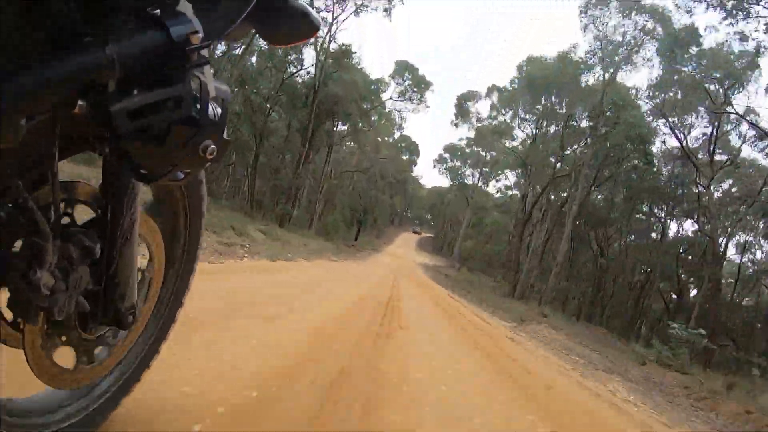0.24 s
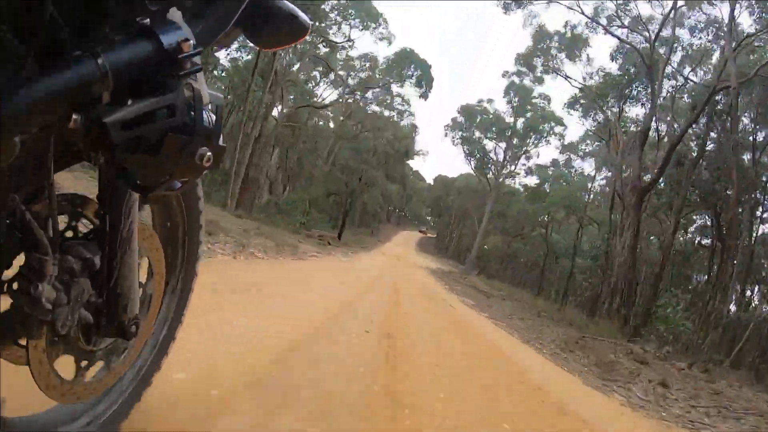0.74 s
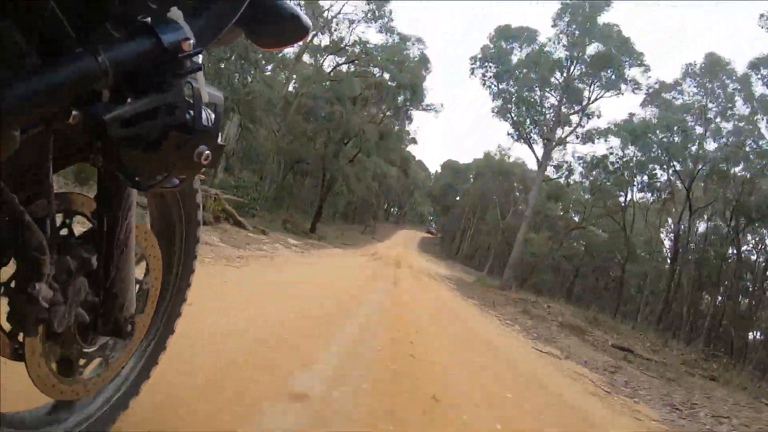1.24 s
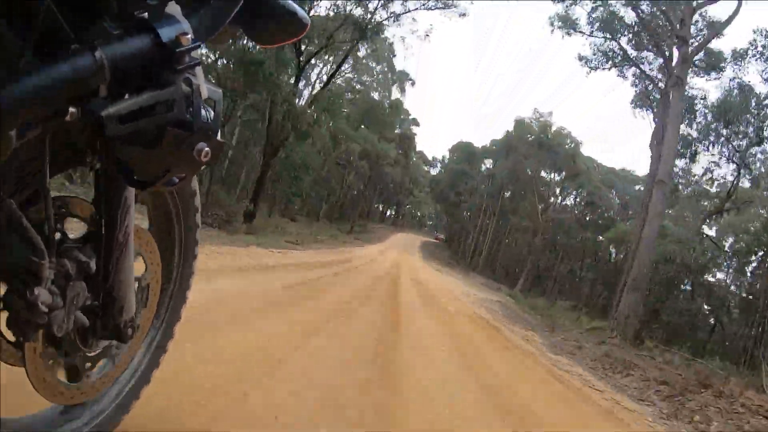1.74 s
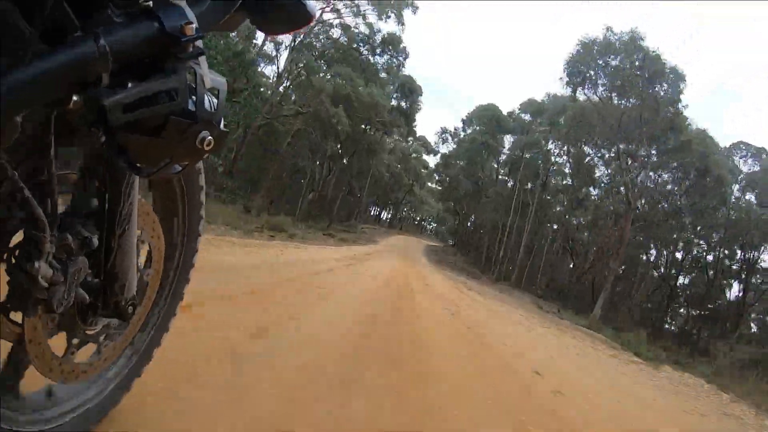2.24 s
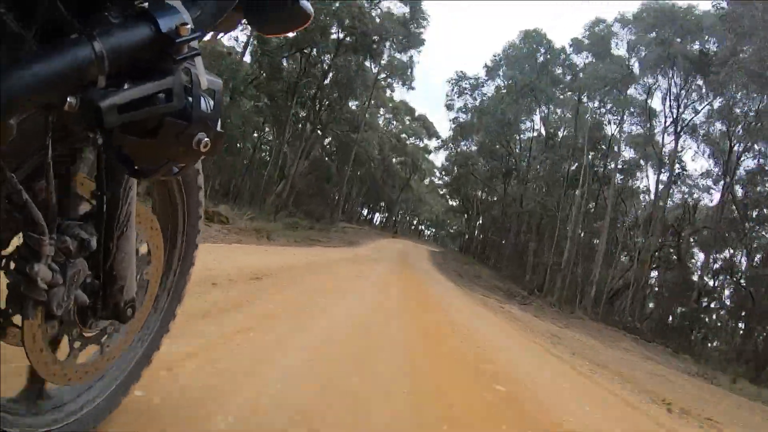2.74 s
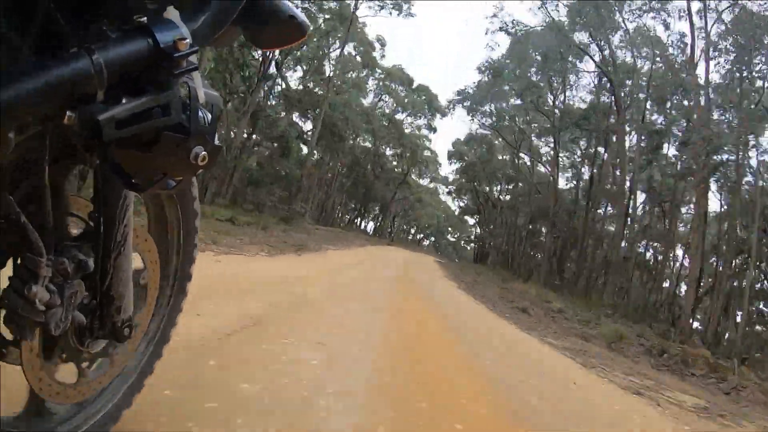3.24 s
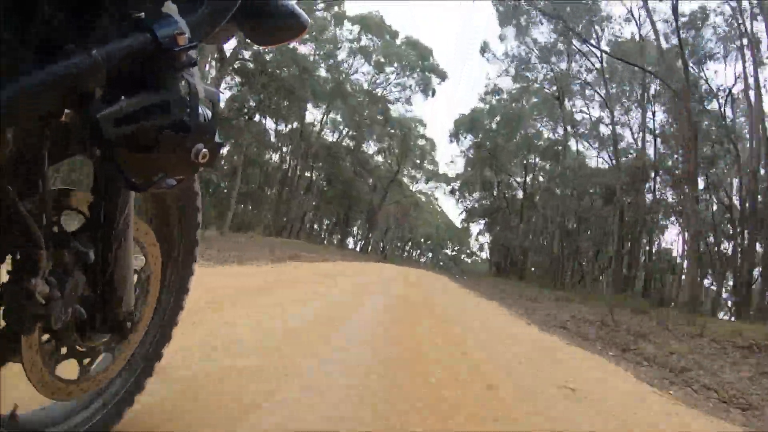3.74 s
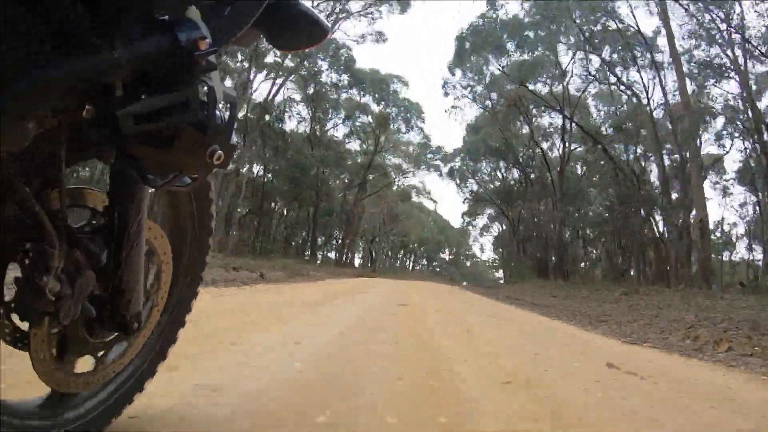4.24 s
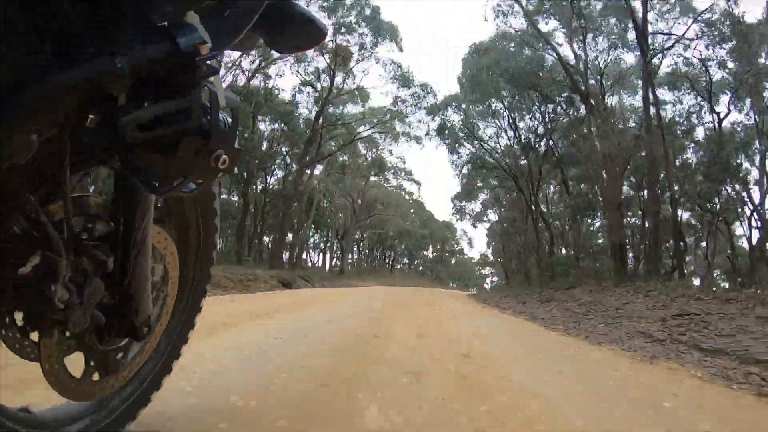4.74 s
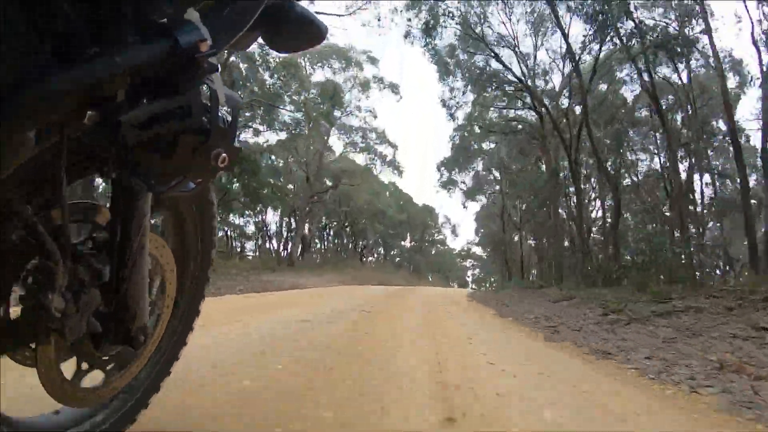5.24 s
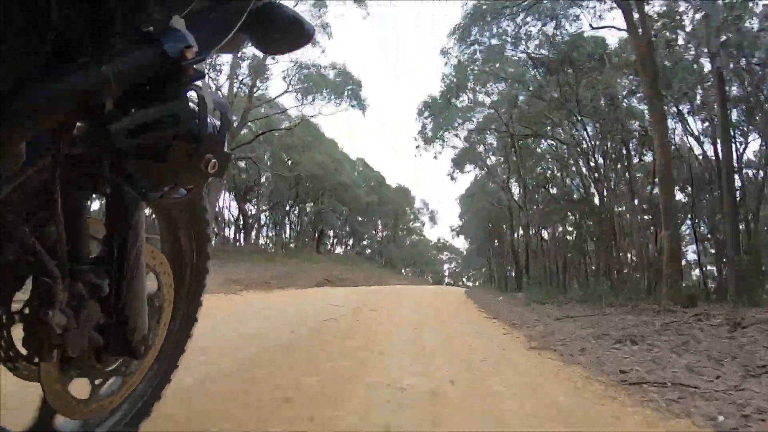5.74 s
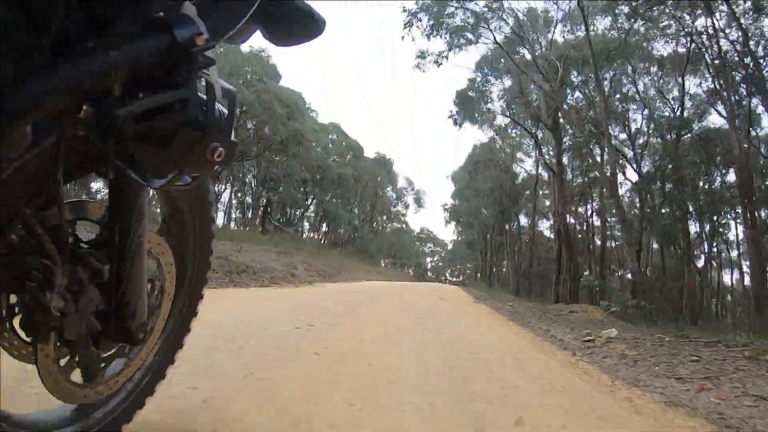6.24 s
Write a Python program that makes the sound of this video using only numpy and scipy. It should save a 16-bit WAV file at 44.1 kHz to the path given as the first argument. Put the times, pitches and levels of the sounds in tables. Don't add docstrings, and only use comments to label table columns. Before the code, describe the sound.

A motorcycle slows on a gravel forest road, heard in mono from right beside the front wheel. The low engine drone slides steadily down in pitch amid rumbling wind buffets, tyre roar and crunching gravel. A hard stone clacks near the end of the slowdown, the clutch briefly softens the engine, then the throttle opens with a boom and a rough, low intake roar.

```python
import sys
import numpy as np
from scipy import signal
from scipy.fft import rfft, irfft, next_fast_len
from scipy.io import wavfile
from scipy.ndimage import uniform_filter1d, map_coordinates

SR = 44100
rng = np.random.default_rng(int(sys.argv[2]) if len(sys.argv) > 2 else 0)


def gain_from_db(level_db):
    decades = np.asarray(level_db, float) / 20
    return 10 ** decades


def wav_record(signal):
    frames = np.transpose(np.atleast_2d(signal))
    bounded = np.clip(frames, -1, 1)
    quanta = np.round(bounded * 32767).astype(np.int16)
    wavfile.write(sys.argv[1], SR, quanta)


N = 286650

# t/s, level/dB
GUSTS = [(0.0, -23.5), (0.05, -17), (0.11, -22.5), (0.38, -20.5), (0.78, -19), (0.83, -27), (0.87, -18),
         (1.34, -21.5), (3.11, -21), (4.05, -22), (5.56, -21.5), (5.68, -19), (6.14, -27.5), (6.17, -19),
         (6.39, -22.5), (6.5, -20)]
# f/Hz, level/dB
BUFFET_SPECTRUM = [(12, -30), (25, -5.5), (40, -8), (55, 3), (75, -3.5), (100, -6), (140, -14.5),
                   (200, -62), (300, -120)]
DRONE_SPECTRUM = [(50, -120), (80, -16), (120, 2.5), (200, -7), (300, -7.5), (400, -11), (520, -20),
                  (800, -120)]
# f/Hz, level/dB
ROAR_SPECTRUM = [(420, -29.5), (720, -6.5), (807, -3.5), (930, -1), (1090, -3.5), (1190, -0.5),
                 (1380, -4.5), (1540, -3), (1900, -10), (2470, -30.5), (4180, -120)]
CARCASS_SPECTRUM = [(220, -24.5), (380, 5), (398, -2.5), (512, 1), (569, 2.5), (664, -1.5), (740, 2),
                    (960, -31), (1630, -120)]
CRUNCH_SPECTRUM = [(1060, -28.5), (1800, -2), (2270, -0.5), (3280, -5.5), (3660, -12.5), (4200, -19.5),
                   (5460, -54.5), (9240, -120)]
# t/s, peak level/dB
STONE_HITS = [
    (.2269, -38),
    (.3556, -32),
    (.6908, -35),
    (4.733, -7.5),
    (6.078, -33),
    (6.121, -28),
    (6.3185, -34),
]
# f/Hz, level/dB, t60/s
HOUSING_MODES = [(2800, -1, .006), (3700, -3, .006), (4600, -3, .005), (5500, -7, .004), (6400, -8, .004),
                 (7400, 0, .0055), (8600, -9, .004)]
# f/Hz, level/dB
CASES_SPECTRUM = [(2240, -12), (3800, -3.5), (4080, -4), (4460, -1.5), (4790, -1.5), (5580, -10),
                  (6600, -15), (7090, -15.5), (7950, -15.5), (9270, -28), (12100, -51.5), (20400, -120)]
AIR_SPECTRUM = [(8500, -120), (9300, -8.5), (10300, -2), (11500, 5.5), (12500, 2.5), (13300, -11),
                (15000, -26), (16000, -120)]
# f/Hz, width/Hz, level/dB
LOAD_BANDS = [(195.3, 82, -27), (2215, 150, -36.5), (3320, 200, -40.5), (1800, 150, -47.5)]
# t/s, f/Hz, level/dB, t60/s
AIRBOX_BOOM = (5.355, 215, -14, 0.5)
# t/s, rate/Hz
FIRING_RATE = [(0.0, 49.0), (0.09, 48.3), (1.07, 46.6), (1.23, 45.5), (1.54, 45.7), (1.7, 45.3),
               (1.86, 44.1), (2.41, 43.3), (4.0, 37.5), (5.18, 32.5), (5.25, 32.5), (5.36, 33.8),
               (5.45, 32.6), (5.77, 33.0), (6.03, 32.8), (6.5, 33.4)]
# t/s, opening/0-1, unevenness/0-1, engine braking/0-1, pull/0-1
THROTTLE_MOVES = [
    (0, 0, .1, 1, 0),
    (5.02, 0, .1, 1, 0),
    (5.14, 0, .5, 0, 0),
    (5.34, 0, .5, 0, 0),
    (5.36, 1, .35, 0, .5),
    (5.7, 1, .24, 0, .8),
    (6.3, 1, .17, 0, 1),
    (6.5, 1, .17, 0, 1),
]
STRONG_MULTIPLES = 2, 3, 4, 6
# shut level before the pipe/dB, open level/dB
STRONG_LEVELS = [(-16.5, -25.5), (-16, -22), (-25.5, -28), (-25.5, -19.5)]
# multiple, shut level/dB, open level/dB
WEAK_LEVELS = [(1, -35, -34), (5, -35, -27), (7, -33, -31), (8, -36, -43), (9, -41, -44), (10, -41, -48),
               (11, -45, -42), (12, -44, -46), (13, -43, -46), (14, -43, -48), (15, -42, -46),
               (16, -40, -49), (17, -45, -44), (18, -42, -44), (19, -45, -48), (20, -44, -46)]
# f/Hz, gain/dB
PIPE_RESPONSE = [(70, -10), (96, -1.5), (122, 2.5), (150, -6), (172, -1.7), (208, 3), (262, -9.5),
                 (290, -7.5)]
# level at middle revs/dB, slope/(dB per Hz of firing rate), rise at full pull/dB
DRONE_LEVEL = (-24.5, .2, .1)
ROAR_LEVEL = (-25, 0.32, 3.2)
CARCASS_LEVEL = (-29, 0.58, 6)
TREAD_LEVEL = (-21.5, 4.4, 25)
CRUNCH_LEVEL = (-30, 0.41, 6.6)
CASES_LEVEL = (-37, 0.31, 5.8)

MID_RATE_HZ = 41
TREAD_KNEE_HZ = 39


def unit(x):
    return x / np.sqrt(np.mean(x ** 2) + 1e-20)


def curves(rows):
    t_s, *cols = np.transpose(rows)
    return [np.interp(np.arange(N) / SR, t_s, col) for col in cols]


def wobble(rate_hz):
    knots = rng.standard_normal(int(N * 200 / SR) + 4)
    return map_coordinates(knots, [np.arange(N) * min(rate_hz, 200) / SR])


def coloured(x, spectrum):
    size = next_fast_len(N + 8192)
    f_hz, level_db = np.transpose(spectrum)
    bins_hz = np.fft.rfftfreq(size, 1 / SR)
    gain = gain_from_db(np.interp(np.log(bins_hz + 1), np.log(f_hz + 1), level_db))
    return unit(irfft(rfft(x, size) * gain, size)[:N])


def rush(spectrum, patchy_db, wide=4, long=20):
    z = signal.stft(rng.standard_normal(N), nperseg=512)[2]
    field = uniform_filter1d(rng.standard_normal(z.shape), int(wide), 0)
    field = uniform_filter1d(field, int(long), 1)
    noise = signal.istft(z * gain_from_db(patchy_db * unit(field)), nperseg=512)[1][:N]
    return coloured(noise, spectrum)


def band(hz, width_hz):
    phase = 2 * np.pi * np.cumsum(hz * np.ones(N)) / SR
    return unit(wobble(width_hz) * np.cos(phase) + wobble(width_hz) * np.sin(phase))


def law(row, speed_hz, pull):
    mid_db, db_per_hz, pull_db = row
    return mid_db + db_per_hz * speed_hz + pull_db * pull


def wind(speed_hz, pull):
    buffet_db, = curves(GUSTS)
    drone_db = law(DRONE_LEVEL, speed_hz, pull) + 1.2 * wobble(2.9)
    eddies = rush(BUFFET_SPECTRUM, patchy_db=0.5)
    envelope = np.abs(signal.hilbert(eddies))
    eddies = unit(eddies * (envelope + .2) ** -.45)
    buffet = gain_from_db(buffet_db + 0.5) * coloured(eddies, [(10, 0), (150, 0.0), (260, -59)])
    return buffet + gain_from_db(drone_db) * rush(DRONE_SPECTRUM, patchy_db=1.5)


def road(speed_hz, pull):
    roar_db = law(ROAR_LEVEL, speed_hz, pull) + .45 * wobble(5)
    crunch_db = law(CRUNCH_LEVEL, speed_hz, pull) + .45 * wobble(5)
    carcass_db = law(CARCASS_LEVEL, speed_hz, pull) + .45 * wobble(5)
    below_knee_hz = np.minimum(speed_hz + MID_RATE_HZ - TREAD_KNEE_HZ, 0)
    tread_db = law(TREAD_LEVEL, below_knee_hz, pull) + 0.83 * wobble(7)
    tread_hz = 1520 + 3 * speed_hz + 25 * wobble(3)
    grains = rng.standard_normal(N) * gain_from_db(2.5 * wobble(190))
    crunch = rush(CRUNCH_SPECTRUM, patchy_db=-0.4, wide=1.8)
    crunch = unit(crunch + 0.81 * coloured(grains, CRUNCH_SPECTRUM))
    out = gain_from_db(carcass_db - 1.0) * rush(CARCASS_SPECTRUM, patchy_db=1.1, wide=2.3, long=24)
    out += gain_from_db(roar_db + 0.5) * rush(ROAR_SPECTRUM, patchy_db=0.7, wide=2, long=54)
    out += gain_from_db(tread_db - 9.0) * band(tread_hz, width_hz=150)
    return out + gain_from_db(crunch_db + 0.1) * crunch


def stones():
    out = np.zeros(N + SR)
    t = np.arange(SR // 40) / SR
    for hit_s, peak_db in STONE_HITS:
        ring = np.zeros(len(t))
        for hz, level_db, t60_s in HOUSING_MODES:
            ring += gain_from_db(level_db - 60 * t / t60_s) * np.sin(2 * np.pi * hz * t + rng.uniform(0, 6.8))
        ring *= 1 - np.exp(-(t / .0004) ** 2)
        for delay_s, bounce_db in ((0, 2.5), (.0013, -14.5)):
            out[round((hit_s + delay_s) * SR):][:len(t)] += gain_from_db(peak_db + bounce_db - 2.0) * ring
    b, a = signal.butter(6, 9200, fs=SR)
    return signal.lfilter(b, a, out[:N]) + gain_from_db(-16) * out[:N]


def clatter(angle, load, speed_hz, pull):
    cases_db = law(CASES_LEVEL, speed_hz, pull)
    beat = gain_from_db(.5 * np.cos(3 * angle) + 0.5 * wobble(5.2) + 0.93 * wobble(150))
    cases = unit(beat * rush(CASES_SPECTRUM, patchy_db=0.76))
    cases += gain_from_db(-22) * band(6400, width_hz=63) + gain_from_db(-18.5) * band(4600, width_hz=98)
    ringing = gain_from_db(-33.5 + 2.2 * wobble(2.35)) * band(930, width_hz=170)
    ringing += gain_from_db(-43.5 + 2.0 * wobble(1.4)) * band(2130, width_hz=120)
    air_db = -69 + 3.1 * load + .9 * wobble(7)
    return ringing + gain_from_db(cases_db + 0.5) * cases + gain_from_db(air_db) * rush(AIR_SPECTRUM, patchy_db=3.3)


def intake(load):
    snap_s, boom_hz, boom_db, t60_s = AIRBOX_BOOM
    t = np.clip(np.arange(N) / SR - snap_s, 0, None)
    boom = gain_from_db(boom_db - 60 * t / t60_s) * (1 - np.exp(-t / .008)) * np.sin(2 * np.pi * boom_hz * t)
    roar = sum(gain_from_db(level_db) * band(hz, width_hz) for hz, width_hz, level_db in LOAD_BANDS)
    return boom + load * roar


def pipe_db(hz):
    f_hz, gain_db = np.transpose(PIPE_RESPONSE)
    return np.interp(np.log(hz), np.log(f_hz), gain_db)


def gear_mesh(angle, rate_hz, braking):
    cover_db = 14 * np.exp(-((23 * rate_hz - 760) / 38) ** 2)
    whine_db = braking * (-50 + cover_db) + (1 - braking) * -50.5
    return gain_from_db(whine_db + 10.5 + 1.3 * wobble(8)) * np.sin(23 * angle)


def engine():
    rate_hz, = curves(FIRING_RATE)
    load, uneven, braking, pull = curves(THROTTLE_MOVES)
    angle = 2 * np.pi * np.cumsum(rate_hz) / SR + .25 * uneven * wobble(20)

    def order(k, drift=0):
        hz = k * rate_hz
        lag = 2.9 - 1.1 * np.exp(-((hz - 125) / 35) ** 2)
        smear = (np.clip(hz - 230, 0, None) / 85) ** 1.5
        return np.cos(k * angle + drift + lag + smear)

    out = np.zeros(N)
    clutch_db = -3.5 * (1 - braking)
    for k, (shut_db, open_db) in zip(STRONG_MULTIPLES, STRONG_LEVELS):
        level_db = (1 - load) * (shut_db + pipe_db(k * rate_hz) + clutch_db) + load * open_db
        out += gain_from_db(level_db + 3 + 5 * uneven * wobble(18) + .8 * wobble(4)) * order(k)
    for k, shut_db, open_db in WEAK_LEVELS:
        shut_db = shut_db + .04 * (k - 10) * (rate_hz - 42) + .4 * pipe_db(k * rate_hz) + 2 * (k > 5)
        level_db = shut_db + load * (open_db - shut_db)
        drift_rad = 1.4 * wobble(1.6)
        out += gain_from_db(level_db + 3 + 1.5 * wobble(4)) * order(k, drift_rad)
    for k in range(21, 38):
        valve_db = -43.5 + .5 * (rate_hz - 39) + 5.9 * load + 3.5 * wobble(2.914)
        out += gain_from_db(valve_db) * np.sin(k * angle + k * k)
    out += gear_mesh(angle, rate_hz, braking)
    return out, angle, load, rate_hz - MID_RATE_HZ, pull


def scene():
    motor, angle, load, speed_hz, pull = engine()
    out = wind(speed_hz, pull) + road(speed_hz, pull) + stones()
    out += clatter(angle, load, speed_hz, pull) + intake(load) + motor
    return out[None]


def top_cut(x):
    return signal.sosfilt(signal.butter(12, 15100, fs=SR, output="sos"), x)


def record(dry):
    fast_power = np.abs(uniform_filter1d(dry ** 2, 1500, axis=1)) + 1e-9
    slow_power = np.abs(uniform_filter1d(dry ** 2, 20000, axis=1)) + 1e-9
    held = dry * (fast_power / slow_power) ** -.18
    held = held / (1 + np.abs(held / .85) ** 5) ** (1 / 5)
    return top_cut(held)


dry = scene()
out = record(dry)
wav_record(out)
```